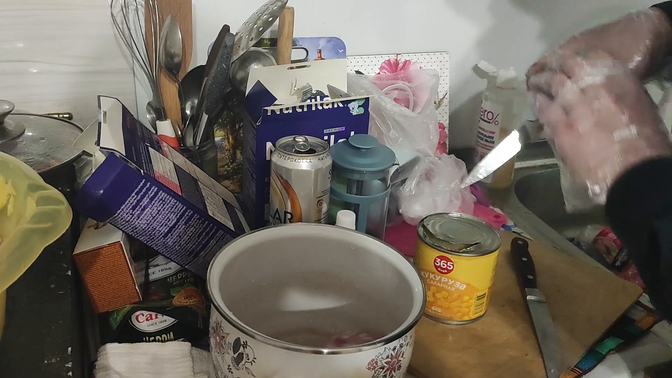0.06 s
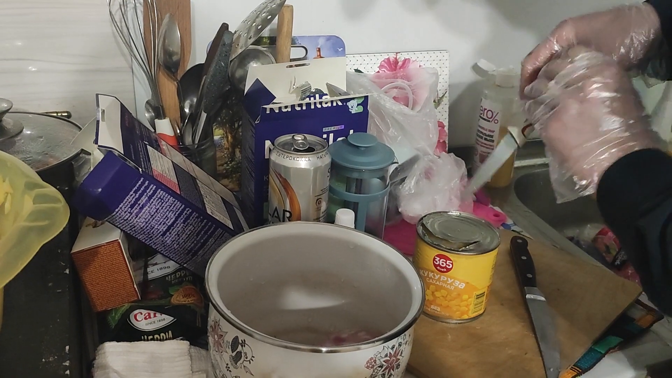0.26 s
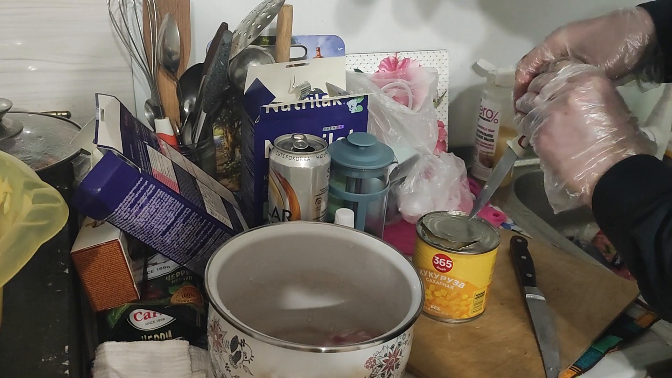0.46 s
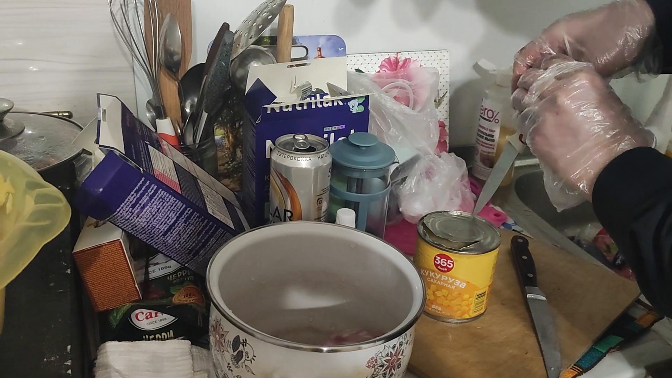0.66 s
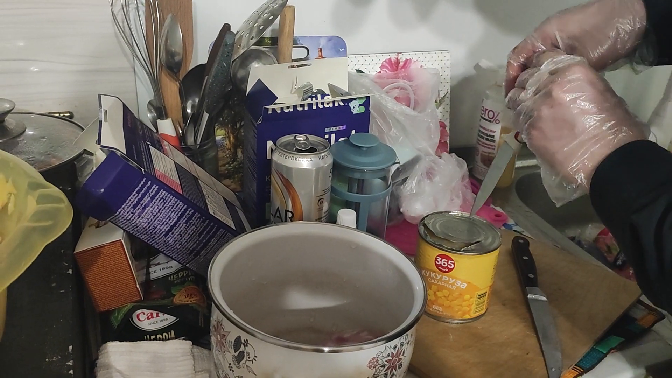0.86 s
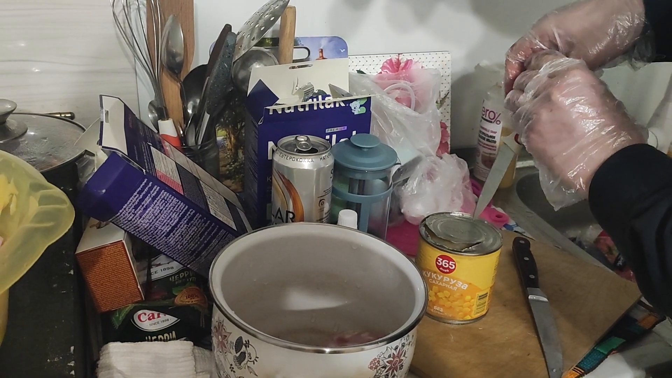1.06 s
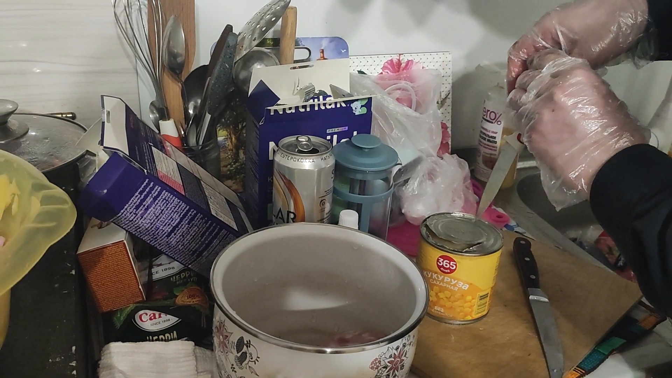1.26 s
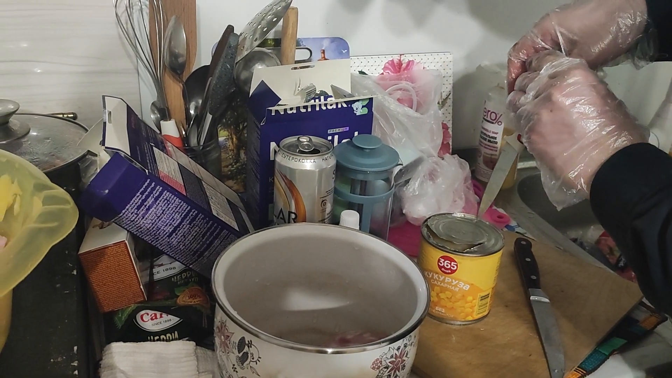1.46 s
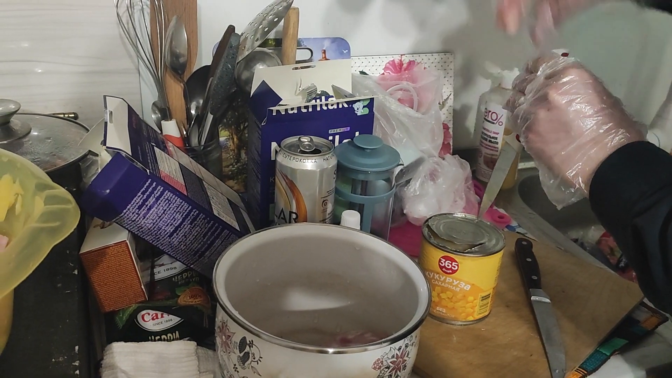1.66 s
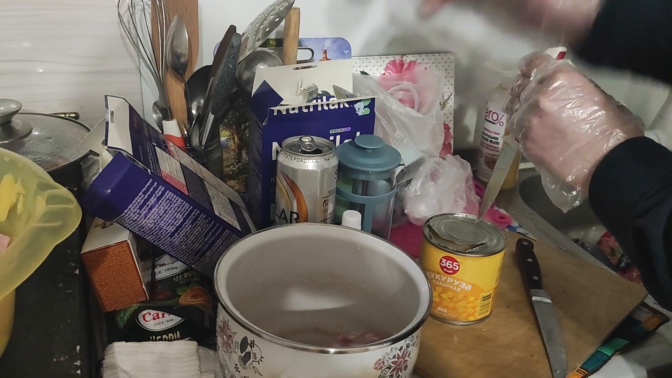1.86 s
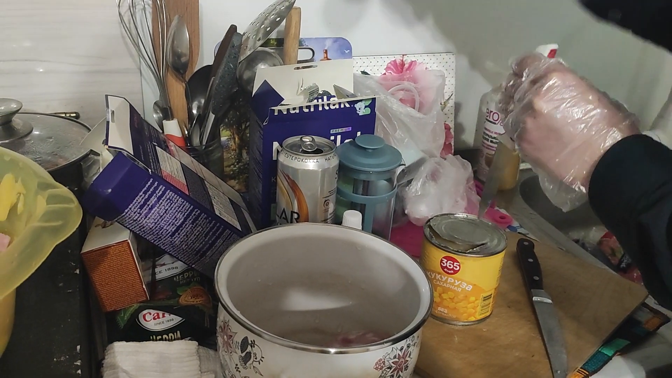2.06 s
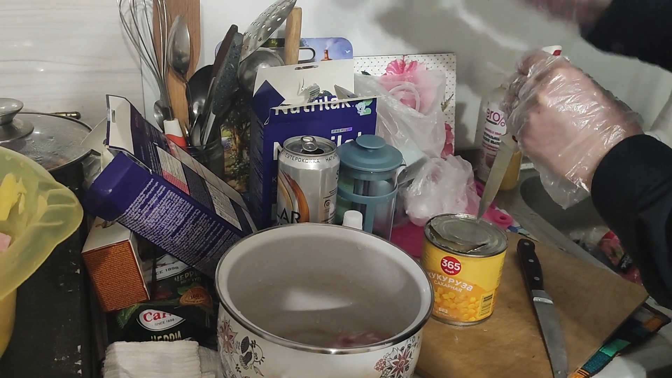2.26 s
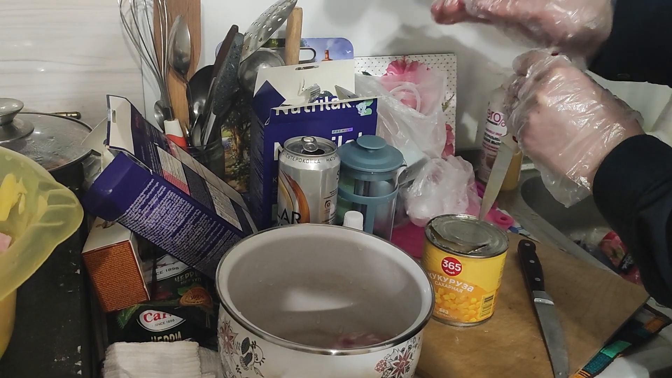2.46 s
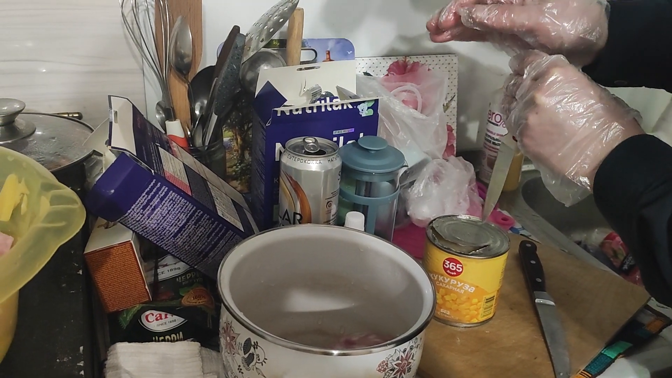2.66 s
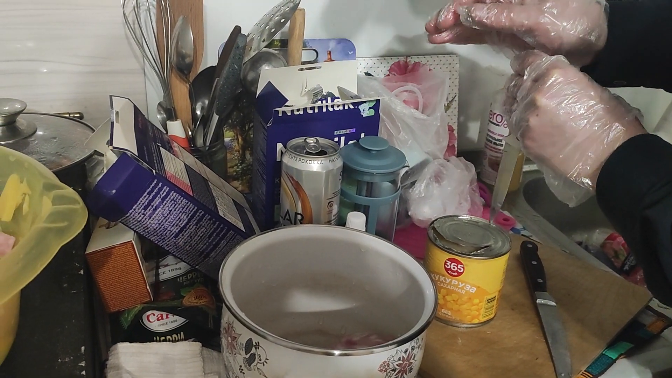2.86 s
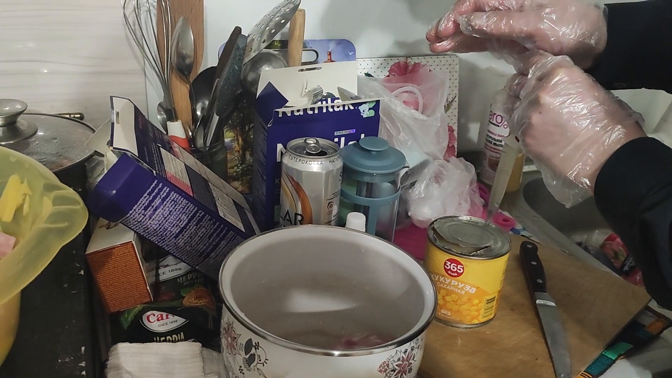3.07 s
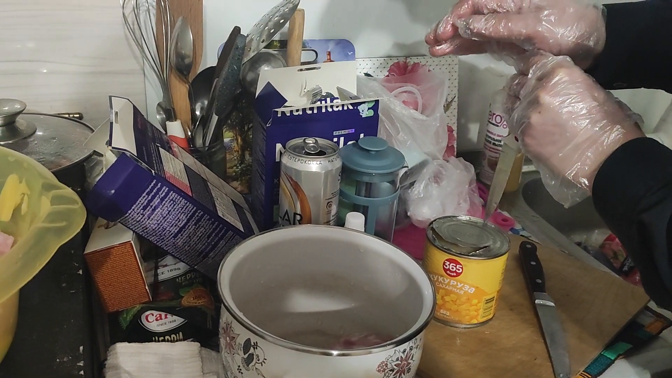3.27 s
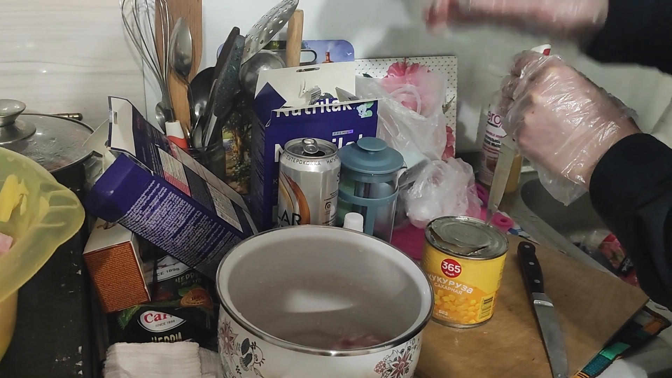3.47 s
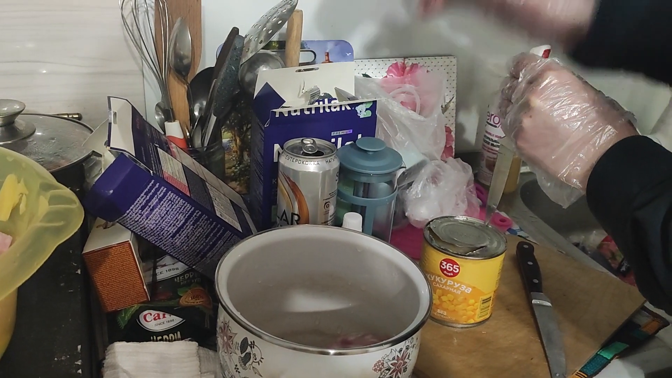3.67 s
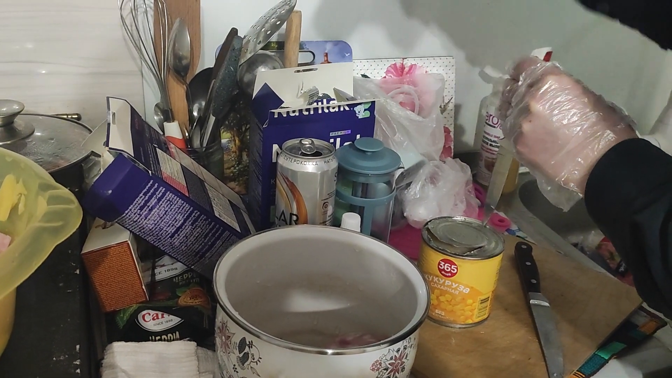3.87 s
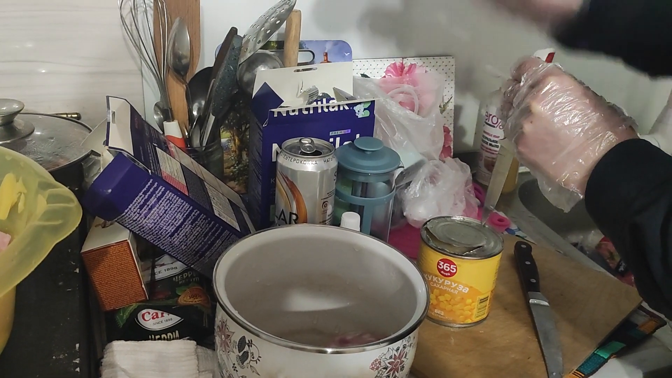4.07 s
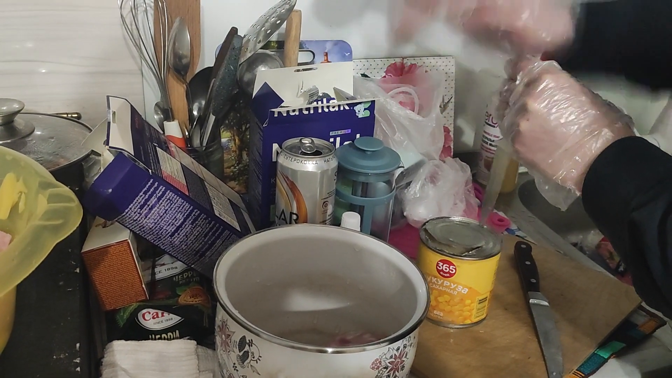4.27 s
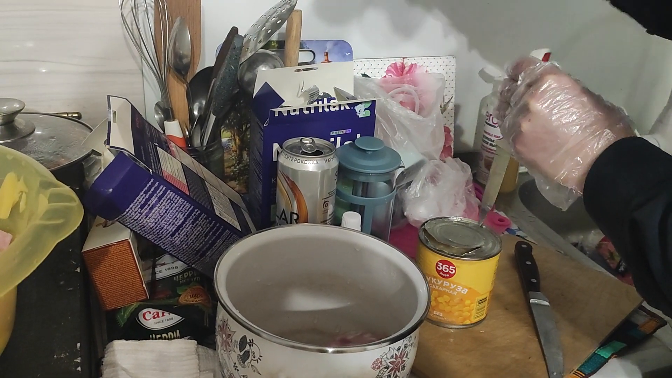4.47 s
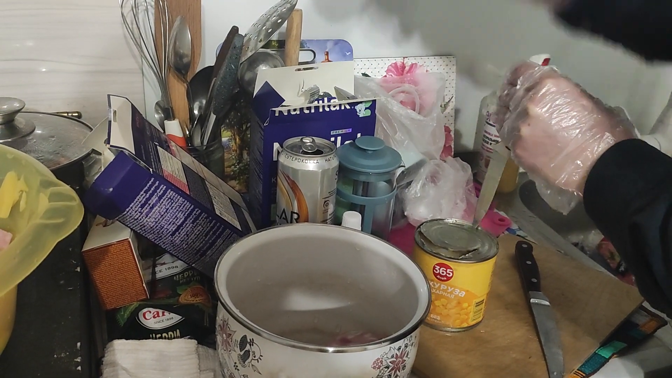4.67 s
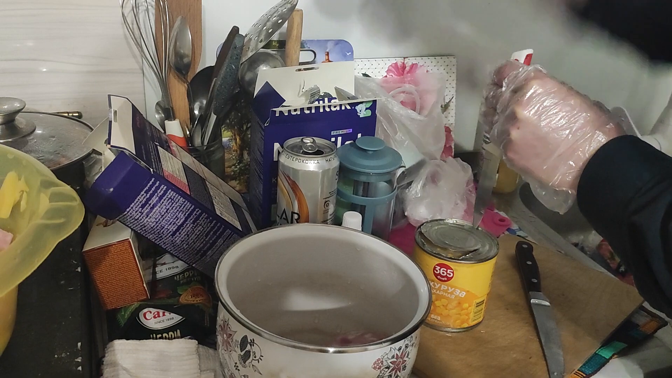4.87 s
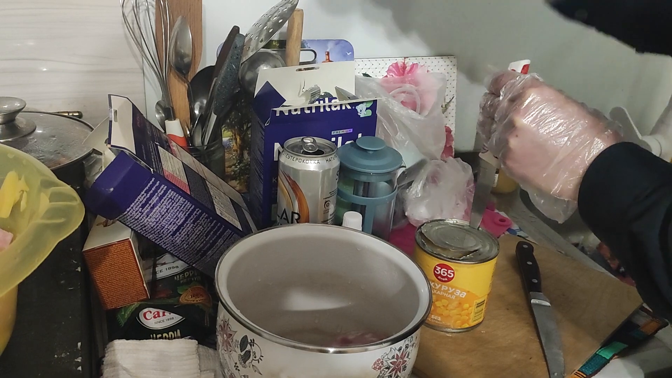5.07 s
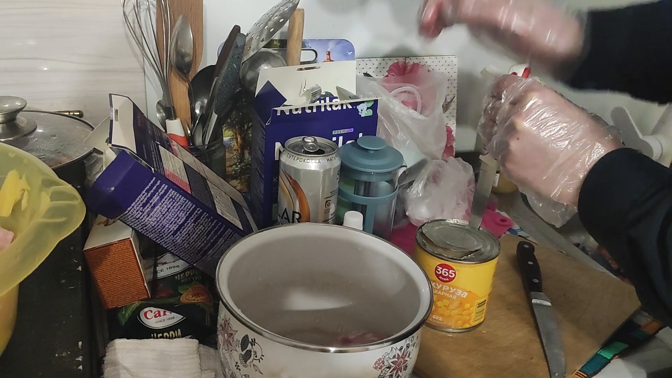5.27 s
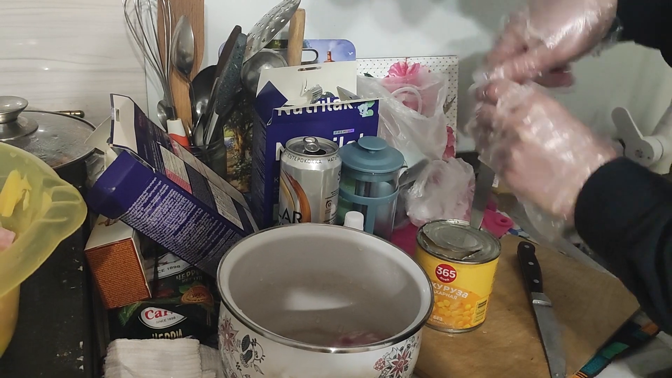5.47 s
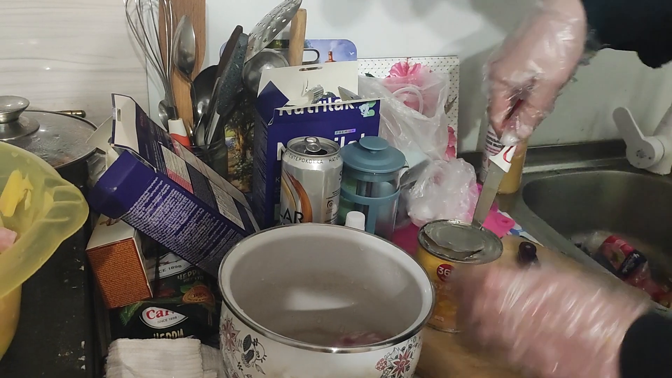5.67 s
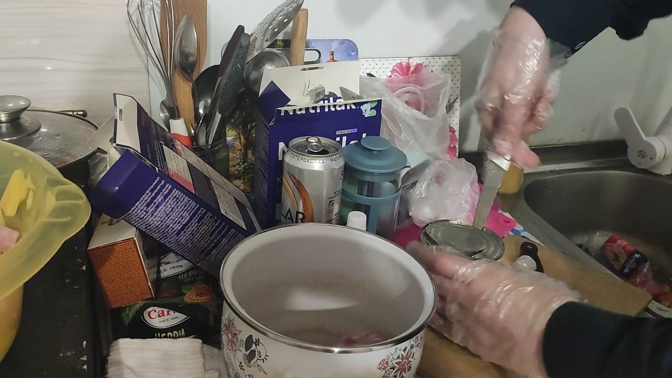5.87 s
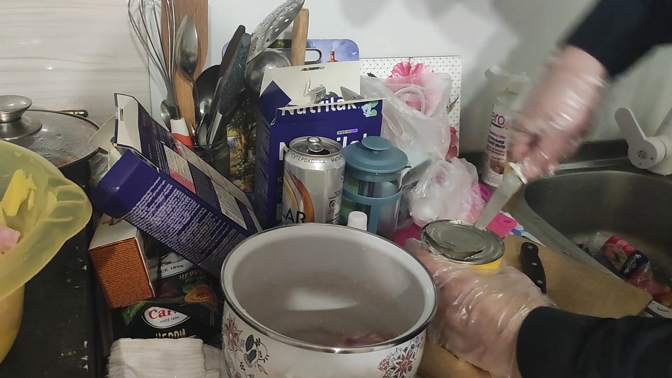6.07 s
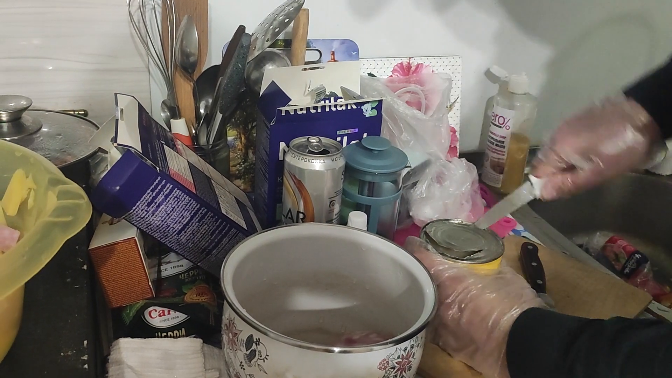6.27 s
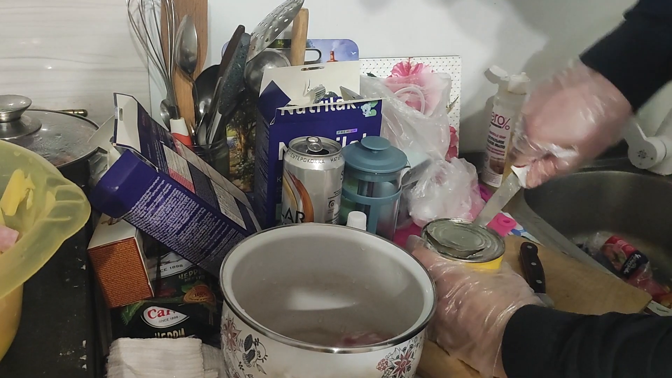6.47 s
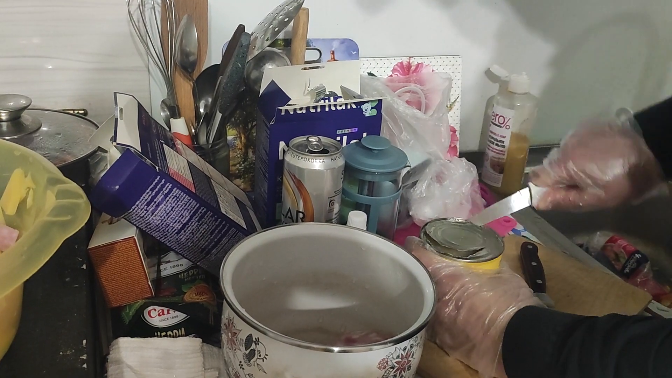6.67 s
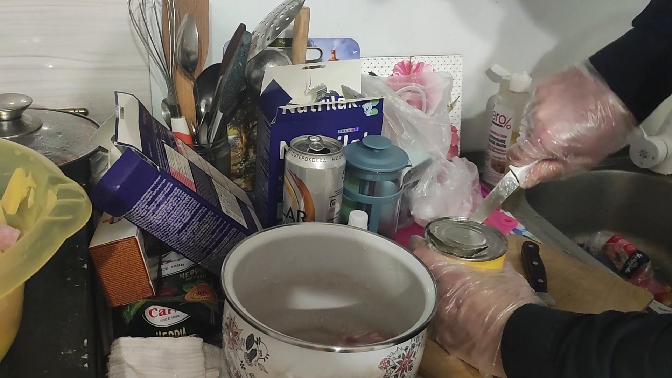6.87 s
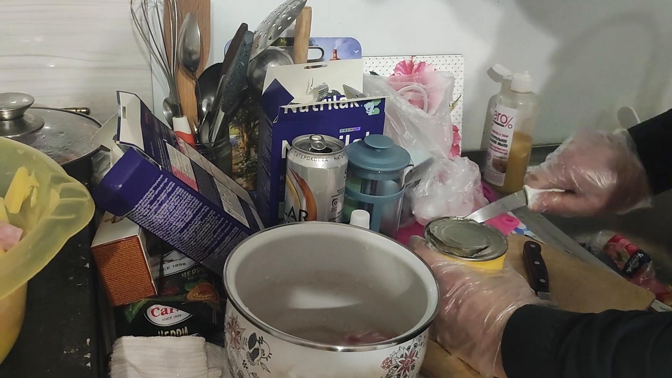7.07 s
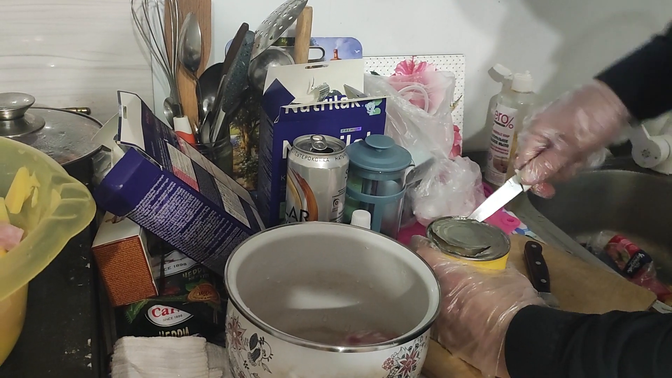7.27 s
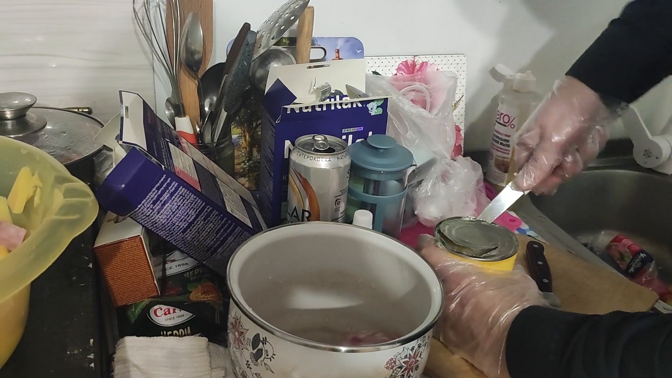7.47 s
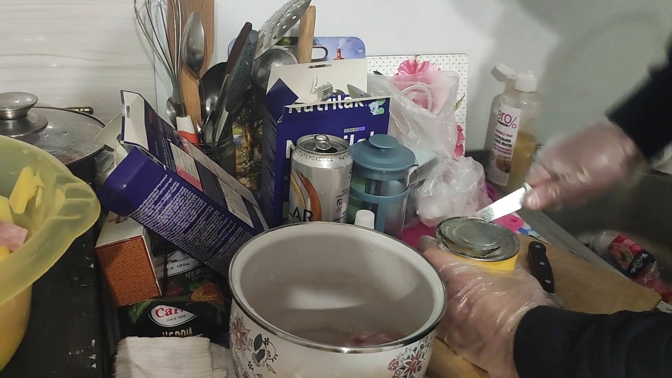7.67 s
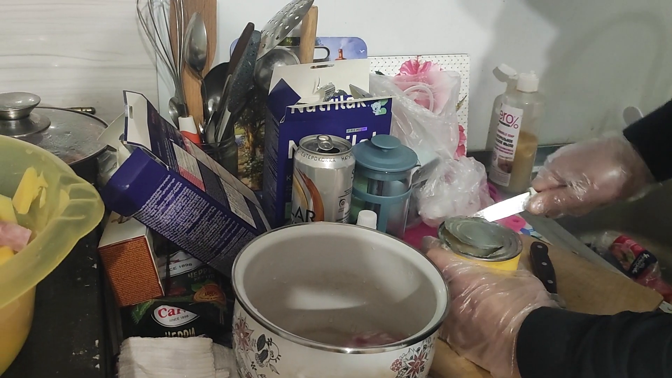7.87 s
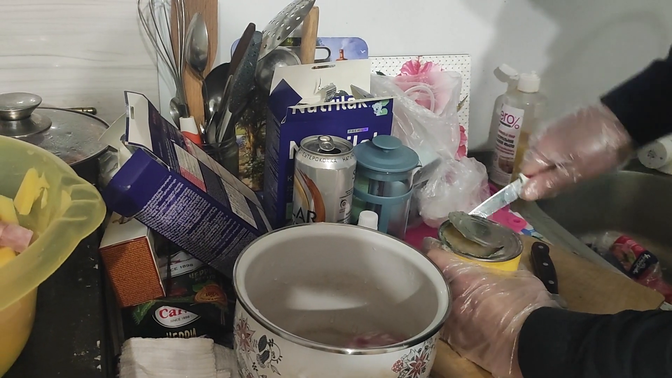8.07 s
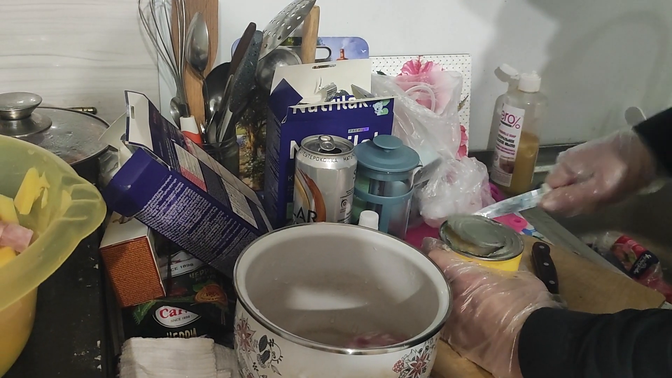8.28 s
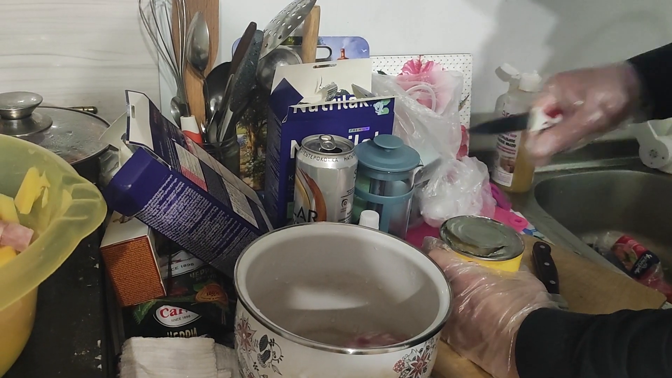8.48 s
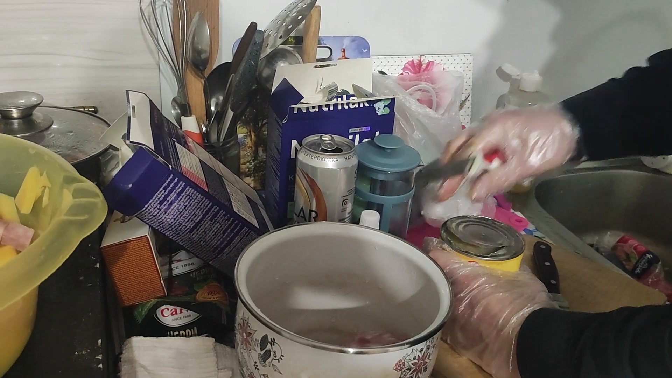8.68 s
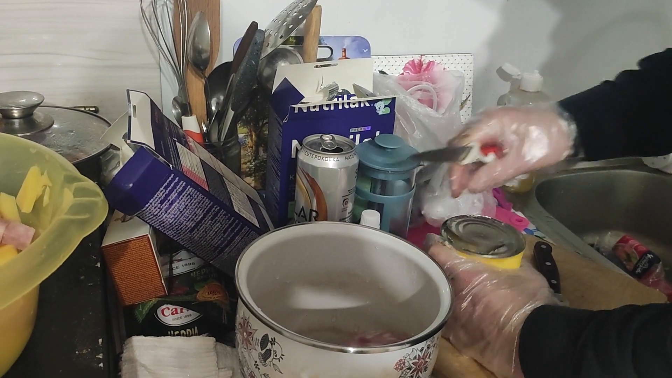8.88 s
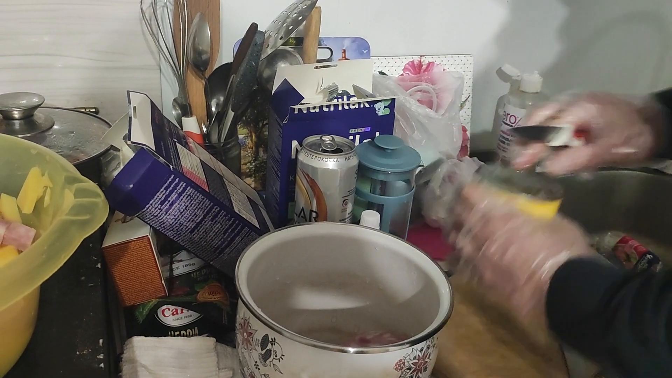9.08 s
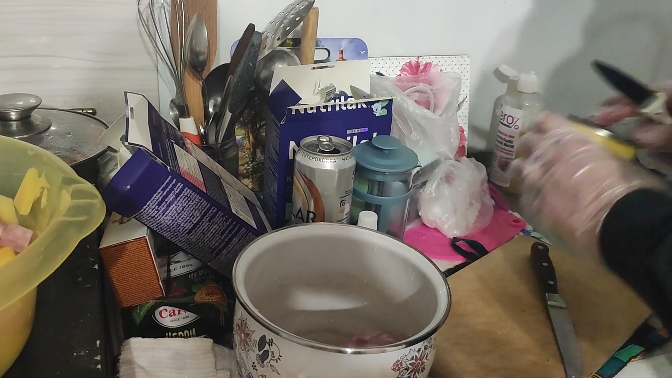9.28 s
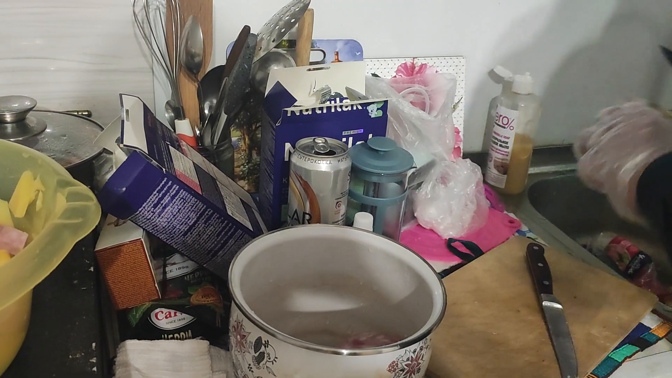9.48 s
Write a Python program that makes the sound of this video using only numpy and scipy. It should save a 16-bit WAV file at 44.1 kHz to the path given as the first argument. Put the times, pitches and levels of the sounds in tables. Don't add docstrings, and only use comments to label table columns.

```python
import sys
import numpy as np
from scipy import signal
from scipy.fft import rfft, irfft, next_fast_len
from scipy.io import wavfile
from scipy.ndimage import uniform_filter1d, minimum_filter1d

SR = 44100
rng = np.random.default_rng(int(sys.argv[2]) if len(sys.argv) > 2 else 0)


def wav_out(sig):
    wavfile.write(sys.argv[1], SR, np.round(np.clip(np.atleast_2d(sig).T, -1, 1) * 32767).astype(np.int16))


def invert_db(level):
    return 10 ** (np.asarray(level, dtype=float) / 20)


N = 419832

# f/Hz, level/dB
KITCHEN_SPECTRUM = [(12, -35), (20, -5), (53, -2.5), (77, -14.5), (128, -11.5), (230, -18), (265, -19),
                    (289, -20), (416, -23.5), (492, -24), (729, -26), (839, -28.5), (5670, -64),
                    (14700, -37), (16500, -46)]
KITCHEN_DB = -62
# f/Hz, level/dB
GLOVE_SPECTRUM = [(180, -14), (300, -11), (349, -4.5), (617, -13), (1060, -7), (1230, -9), (3030, -6.5),
                  (4540, -7), (7020, -4.5), (8020, -6), (10300, -3), (15200, -0.5), (16500, -8.5)]
# f/Hz, level/dB
SCRAPE_SPECTRUM = [(180, -20), (300, 0), (767, -9), (1050, -5), (1240, -5.5), (2230, -6), (2800, -8.5),
                   (3830, -10.5), (4680, -8), (7810, -15.5), (9000, -36), (11700, -62), (19800, -120)]
# t/s, glove rustle/dB, blade and sleeve/dB
BUSY = [(0, -53.5, -60.5), (.4, -61.5, -56.5), (.75, -64, -63.5), (1.3, -71.5, -68), (2.2, -65, -67.5),
        (2.7, -67, -63.5), (3.0, -72.5, -71), (3.3, -79, -66), (3.6, -69, -61.5), (5.05, -62.5, -76),
        (5.35, -52.5, -90), (5.9, -53, -50), (6.2, -62, -58), (6.9, -65, -55), (7.4, -58, -72),
        (7.56, -62.5, -73), (8.6, -64.5, -62), (9.52, -62.5, -53.5)]
# t/s, peak/dB, swell/s, fade/s
CRUMPLES = [(.37, -58.5, 0.046, .05), (1.578, -51, 0.12, 0.048), (1.7, -59.5, 0.073, .1),
            (1.848, -46.5, 0.065, 0.06), (3.39, -59, 0.084, 0.068), (3.9, -57.5, 0.072, 0.084),
            (4.18, -58.5, 0.082, 0.043), (4.48, -58.5, 0.098, 0.028), (4.82, -60.5, 0.11, .03),
            (6.97, -50, 0.022, 0.046), (7.13, -57, 0.097, 0.079), (7.29, -51.5, 0.14, 0.11),
            (7.85, -58, 0.014, 0.016), (8.01, -55, 0.014, 0.037), (8.08, -56, 0.0089, 0.02),
            (8.18, -56.5, 0.062, 0.1), (8.32, -53.5, 0.073, 0.28), (8.84, -57.5, 0.11, 0.17),
            (9.05, -56.5, 0.15, 0.096)]
# t/s, peak/dB, fade/s
SLAPS = [
    (2.768, -51, 0.038),
    (3.627, -50, 0.1),
    (3.931, -47.5, 0.079),
    (4.211, -43.5, 0.065),
    (4.504, -45, 0.067),
    (4.843, -42.5, 0.077),
    (5.134, -44, 0.089),
]
SLAP_SWELL_S = 0.013
# t/s, peak/dB, swell/s
DRAGS = [(1.17, -54, 0.017), (2.01, -52.5, 0.48), (2.36, -58, 0.016), (3.95, -52, 0.02), (4.26, -49, 0.077),
         (4.52, -45, 0.025), (7.6, -48.5, 0.079), (7.66, -46, 0.028), (7.72, -41.5, 0.046),
         (7.78, -42, 0.1), (7.92, -46.5, 0.055), (8.015, -37, 0.011), (8.1, -49, 0.054),
         (8.24, -37.5, 0.052), (8.32, -50, 0.035), (8.88, -51.5, 0.17), (9.062, -45, 0.032)]
DRAG_FADE_S = 0.048
HOLD = 1.52

# f/Hz, level/dB, t60/s
BOARD_MODES = [(225, -6, 0.27), (262, 1, 0.058), (272, 1.5, 0.14), (373.6, -5, 0.43), (437, -5.5, 0.054),
               (456.5, -7, 0.29), (620, -1, 0.063), (819, -8.5, 0.23)]
# f/Hz, level/dB, t60/s
WORKTOP_MODES = [(53.4, -16, 0.9), (55, 1, 0.14), (66.3, 7.5, 0.29), (82.5, -3.5, 0.62),
                 (105.2, -6.5, 0.52), (123, 2, 0.42), (147.3, 8.5, 0.35), (182.8, 6.5, 0.34)]
# t/s, board peak/dB, worktop above it/dB
THUMPS = [(0.356, -51, -17), (1.163, -46, -24), (1.837, -36.5, -13), (2.105, -46, -25), (2.16, -54, -21),
          (2.758, -40.5, -15), (2.799, -48, -17), (2.863, -46.5, -26), (3.631, -52.5, -1), (3.93, -36, 2),
          (4.204, -28, -3.5), (4.502, -22, -6), (4.836, -27, -9.5), (5.131, -32.5, -6.5),
          (6.196, -43.5, -19), (6.959, -47, -12), (7.293, -41, -29), (7.619, -39, -10), (7.84, -40.5, -18),
          (7.954, -37.5, -34), (8.009, -38.5, -14), (8.085, -42.5, -14), (8.2, -35, 0), (8.295, -46.5, -7)]
FAR_EDGE_S = .008

# f/Hz, level/dB, t60/s
FLAT_LID = [(372, -2.5, 0.12), (690, -20, 0.027), (1113, 0.5, 0.11), (1488, -4, 0.098), (1848, 2, 0.064),
            (1885, -7, 0.18), (1994, -2.5, 0.11), (2410, 2.5, 0.11), (2940, -31, 0.069), (3250, -25, 0.056),
            (3673, -0.5, 0.15), (4700, -25, 0.06), (5070, -6, 0.2), (6640, 1, 0.017), (7900, -14, 0.018),
            (8700, -33, 0.039)]
# f/Hz, level/dB, t60/s
BENT_LID = [(470, -14, 0.12), (1040, -1, 0.09), (1074, -8, 0.29), (1315, 6.5, 0.027), (1506, -2, 0.094),
            (1690, 1, 0.096), (1910, -7, 0.22), (2282, -0.5, 0.23), (2420, -1.5, 0.13), (2430, -17, 0.23),
            (2800, 4, 0.013), (3850, -3, 0.14), (5170, 10, 0.01), (5600, -4.5, 0.096), (8240, -17, 0.066)]
# f/Hz, level/dB
CRUNCH_SPECTRUM = [(300, -14), (700, -4), (1100, 5.5), (2000, 6.5), (3300, 4.5), (4600, -0.5), (6000, -8),
                   (8000, -10), (15000, -19)]
# t/s, peak/dB, favoured ring f/Hz, ring/dB, brightness/dB per octave
BLOWS = [
    (0.359, -27.5, 1270, -1.5, 2),
    (1.162, -35.5, 2100, 4, 4),
    (2.102, -29.5, 1280, 1, 1.5),
    (2.242, -51, 2080, 7.5, -8),
    (2.758, -17.5, 1760, -6.5, 0.5),
    (2.799, -35.5, 1100, -9, -11),
    (2.864, -54, 1960, 12, -14),
    (4.206, -32.5, 1950, -5, -9.5),
]
# t/s, peak/dB, favoured ring f/Hz, ring/dB, brightness/dB per octave
TEARS = [(0.462, -37.5, 2400, 2, 1.5), (0.868, -39, 2110, 1, -1.5), (1.086, -45.5, 2420, -2, 0),
         (1.817, -44, 2001, 2, -3), (1.834, -28.5, 1730, 6.5, 12), (1.97, -39, 1950, -0.5, 4.5),
         (2.014, -49.5, 1940, 10.5, -7), (2.152, -40, 1220, -3, -4), (3.32, -53, 1950, 2, 4),
         (3.931, -49, 2340, 5, -6), (4.505, -12, 2000, -19, 2), (4.842, -16, 2000, -9, 3.5),
         (5.135, -21, 2060, -3, -3)]
# t/s, peak/dB, favoured ring f/Hz, ring/dB, brightness/dB per octave
PRIES = [(6.197, -55, 923, -5, -6), (6.9593, -17, 1117, -7.5, -2.5), (7.28, -16.5, 1210, -11, -3),
         (7.569, -37.5, 1210, -20.5, -10), (7.626, -16, 1690, 2, 2), (7.845, -25.5, 1060, -1, -8),
         (7.952, -24, 1100, -3, 0.5), (8.013, -32, 2700, -6, 5), (8.048, -37, 2640, 7, -10),
         (8.08, -22.5, 1040, -5, -4), (8.193, -20.5, 1420, -7, -11), (8.234, -20.5, 1080, 0, 3),
         (8.249, -19.5, 2270, -9, 0), (8.281, -31, 2230, -12, 8), (8.295, -17.5, 2270, -4.5, 6),
         (8.518, -43, 2480, -11, 1)]
# t/s, peak/dB, favoured ring f/Hz, ring/dB, brightness/dB per octave
RASPS = [(5.928, -37.5, 1470, -2, 13.5), (6.138, -50, 1290, 1, -12), (6.22, -40, 1670, -8, 6),
         (6.372, -38, 1190, -13, -6), (6.486, -43.5, 1090, -3, -8.5), (6.634, -40, 1420, -3, -3.5),
         (6.785, -48, 2400, -3, -11.5), (7.107, -48.5, 1494, 3, -5), (7.232, -33, 1680, -8, 6),
         (7.343, -32.5, 1600, 0, 0.5), (7.59, -36.5, 1210, -8, -8.5), (7.645, -28.5, 5400, 3, -4),
         (7.82, -41, 1040, -13, -5), (8.002, -30, 1080, -3, 0), (8.177, -27.5, 1420, -2, -2),
         (8.213, -23, 2260, -2.5, 3), (8.254, -30.5, 2370, 4, -3), (8.702, -48, 3020, -1, 7),
         (8.851, -47.5, 1560, 9, -6), (9.039, -46, 2270, -17, 11)]
BLOW_MS, TEAR_MS, PRY_MS, RASP_MS = 4.94, 11, 6, 28
POP_S, POP_PAN_DB = 7.625, -14

# t/s, peak/dB, contact/ms, left
# minus right/dB
SNAPS = [
    (0.359, -32.5, 4, -7),
    (1.829, -36, 13, -4),
    (2.101, -40, 7.1, -4),
    (2.756, -22.5, 10, -4),
    (4.504, -22.5, 5.8, -6),
    (4.840, -15.5, 13.6, -1),
    (5.134, -31, 9.7, -5),
    (6.9584, -12, 1.8, -1.5),
    (7.278, -23, 4.4, -9),
    (7.6245, -14.5, 3.7, -13.5),
         (.866, -45, 3.2, -4), (1.162, -40.5, 5.3, 1), (7.6314, -11, 1.9, -5), (7.843, -36.5, 5, -4),
          (7.951, -31, 4.2, -2), (8.079, -40, 4.7, -1), (8.190, -30, 9.8, -3), (8.232, -24.5, 11, -6),
          (8.294, -24, 7.4, -3), (7.690, -34.5, 34, -11), (7.66, -36, 60, -6), (8.092, -40, 15, -2),
          (8.303, -32.5, 55, -5), (4.858, -30, 45, -1)]
# f/Hz, width/Hz, level/dB
SNAP_SHAPES = [
    [(1240, 86, 7.5), (2584, 130, 4), (3650, 89, -15), (5620, 110, -21), (7700, 290, -28)],
    [(1830, 35, 3), (2450, 55, -6), (3820, 52, -18), (5300, 54, 0), (6500, 30, -14), (8100, 91, -14)],
    [(1220, 37, -12), (1980, 29, 7), (3600, 83, -8), (5070, 130, -12), (8950, 20, -19)],
    [(1060, 38, -0.5), (1856, 33, 0.5), (3570, 37, -14), (3840, 28, -19), (5370, 72, -9), (6470, 200, -18)],
    [(2020, 35, -2), (2980, 32, -7), (3777, 83, -1), (7780, 150, -8), (9510, 38, -7), (11100, 47, -19)],
    [(1040, 33, -9), (1950, 39, -6), (2390, 38, -12), (2780, 39, -7.5), (5200, 120, -14),
     (6740, 120, -20.5), (7720, 200, -21), (9100, 47, -27)],
    [(1960, 31, 1), (2400, 27, 0), (3000, 39, -8), (5270, 56, -12), (6400, 38, -17)],
    [(1040, 50, -2), (1794, 95, -1), (2163, 145, 2.5), (3730, 120, -9), (5470, 150, -8), (7940, 240, -7),
     (9060, 200, -12), (10800, 290, -11), (12000, 250, -16)],
    [(1090, 170, -0.5), (1420, 140, -2), (2930, 130, 0), (3800, 120, -1), (5870, 400, -16),
     (8100, 440, -22)],
    [(1080, 90, -3), (1670, 110, -4), (2220, 76, -10), (3490, 160, -30), (4090, 350, -13),
     (5400, 160, -7.5), (7140, 190, -23), (8160, 100, -24), (9130, 370, -20.5)],
]
# f/Hz, width/Hz, level/dB
MORE_SNAP_SHAPES = [
    [(1977, 36, 0), (2380, 32, 0), (3300, 59, -13), (4430, 61, -13)],
    [(1143, 89, -5), (1970, 37, -2), (2420, 24, 1), (3630, 52, -5)],
    [(1666, 19, 6), (3460, 31, -20), (5260, 280, -15.5), (6300, 22, -20)],
    [(1020, 31, 0), (2400, 34, -12), (4260, 34, -17), (5840, 29, -18), (13000, 34, -23)],
    [(1100, 190, 2), (2240, 140, -8), (5900, 300, -6), (8110, 440, -21), (13000, 150, -21)],
    [(1036, 23, -2), (2270, 30, -11), (3870, 33, -14), (4170, 39, -13)],
    [(1420, 140, 2), (2600, 95, -11), (3890, 110, -14), (4530, 83, -22), (5080, 140, -20)],
    [(2260, 69, -2), (3240, 190, -10), (3960, 60, -5), (4410, 25, -13), (5000, 78, -14), (7710, 29, -5)],
    [(2230, 31, 1), (3540, 36, -5), (3960, 200, -10), (6240, 29, -14), (7550, 47, -9), (8800, 27, -19)],
    [(1727, 59, 1), (2930, 96, -17), (4180, 63, -8), (5640, 130, -13), (6410, 40, -23)],
    [(3300, 400, 1), (4700, 500, -2), (6500, 600, -8)],
    [(1050, 60, -2), (1700, 200, -6)],
    [(2290, 60, 0), (4700, 400, -20)],
    [(1950, 60, 0), (2380, 60, -12)],
]
SHARPEST = 90

KNIFE_PAN_DB = -1
SCATTER_HZ, SCATTER_DB = 450.1, -19
# f/Hz, left minus right/dB
PORT_TILT = [(60, 0.5), (400, 0.5), (1300, -3), (4400, -0.5), (8100, -3), (15000, 3.5)]
# f/Hz, level/dB
CASING = [(20, -6.5), (45, 2), (4000, 3.5), (4650, 1), (5500, 2), (6300, 1.5), (7000, -0.5), (7900, 5),
          (9500, 2), (10500, -1.5), (11500, 0.5)]
TOP_HZ = 15850


def unit(x):
    return x / np.sqrt(np.mean(x ** 2))


def colour(x, table, share=1):
    hz, db = np.transpose(table)
    length = x.shape[-1]
    size = next_fast_len(length)
    f = np.maximum(np.arange(size // 2 + 1) * SR / size, 1)
    gain = invert_db(share * np.interp(np.log(f), np.log(hz), db))
    return irfft(rfft(x, size) * gain, size)[..., :length]


def band(x, lo_hz, hi_hz):
    edges = [lo_hz, min(hi_hz, .45 * SR)]
    return signal.sosfilt(signal.butter(2, edges, "band", fs=SR, output="sos"), x)


def walk(rate):
    k = int(SR / rate)
    steps = np.repeat(rng.standard_normal(N // k + 1), k)
    return uniform_filter1d(uniform_filter1d(steps, k), k)[:N]


def pair(x, alike_hz):
    side = signal.sosfilt(signal.butter(1, alike_hz, "high", fs=SR, output="sos"), x[1])
    return np.array([x[0] + side, x[0] - side])


def add(out, sound, s):
    at = int(s * SR)
    out[:, at:at + sound.shape[1]] += sound


def pan(db):
    return invert_db(np.array([[db], [-db]]) / 2)


def ring(modes, t, lift_db, luck, spread):
    hz, db, t60 = np.transpose(modes)[:, :, None]
    pitch_luck, level_luck, port_luck, phase_luck = luck
    hz = hz * (1 + 0.0069 * pitch_luck)
    start = invert_db(db + lift_db + 1.44 * level_luck) * np.exp(1j * np.pi * phase_luck)
    turn = np.exp((2j * np.pi * hz - np.log(1000) / t60) / SR)
    swing = start * np.cumprod(turn.repeat(len(t), axis=1), axis=1)
    part = 0.37 * hz / 1000 + spread * np.sqrt(hz / 1000) * port_luck
    return np.imag([np.sum(swing * np.exp(-side * part * 1j / 2), axis=0) for side in (1, -1)])


def excite(body, force):
    out = signal.fftconvolve(body, force[None], axes=1)[:, :len(force)]
    return out / abs(out).max()


def kitchen():
    air = unit(colour(pair(rng.standard_normal((2, N)), 300.0), KITCHEN_SPECTRUM))
    hum = np.zeros(N)
    for hz, db in [(51., -12.5), (120., -24.0)]:
        level = invert_db(db + 6.8 * walk(4.8))
        hum += level * np.sin(2 * np.pi * hz * np.arange(N) / SR + 1.3 * walk(24))
    return invert_db(KITCHEN_DB + 0.7) * (air + hum)


def gestures(rest_db, rows):
    t = np.arange(0, N, 64) / SR
    power = invert_db(2 * np.interp(t, np.transpose(BUSY)[0], rest_db))
    for s, db, swell_s, fade_s in rows:
        away = np.where(t < s, (s - t) / swell_s, (abs(t - s) / fade_s) ** HOLD)
        power = power + invert_db(2 * db - 20 * away)
    return np.interp(np.arange(N) / SR, t, np.sqrt(power))


def hands():
    _, glove_db, scrape_db = np.transpose(BUSY)
    grains = rng.standard_normal((2, N)) * invert_db(1.5 * rng.exponential(size=N) + 1.75 * walk(70))
    glove = unit(colour(pair(grains, 1500.0), GLOVE_SPECTRUM))
    rub = rng.standard_normal((2, N)) * invert_db(2.46 * rng.exponential(size=N) + 3.1 * walk(45))
    scrape = unit(colour(pair(rub, 1550.0), SCRAPE_SPECTRUM))
    slaps = [(s, db, SLAP_SWELL_S, fade_s) for s, db, fade_s in SLAPS]
    drags = [(*row, DRAG_FADE_S) for row in DRAGS]
    rustling = invert_db(7.0) * gestures(glove_db, CRUMPLES + slaps) * glove
    return rustling + invert_db(-6.0) * gestures(scrape_db, drags) * scrape


def board():
    out, t = np.zeros((2, N + SR)), np.arange(int(.4 * SR)) / SR
    for s, db, worktop_db in THUMPS:
        luck, rocking = rng.standard_normal((4, len(BOARD_MODES), 1)), rng.standard_normal(len(t))
        lift_db = -.45 * max(db + 41.5, 0) * np.log2(np.array(BOARD_MODES)[:, :1] / 250.)
        press = 0.03 * max(db + 39.5, 0)
        damped = [(hz, mode_db, 0.33 * t60 / (1 + press * (hz / 360.0) ** 2))
                  for hz, mode_db, t60 in BOARD_MODES]
        wood = ring(damped, t, lift_db, luck, .05)
        landing = np.exp(-((t - .005) / 0.000097) ** 2)
        far_edge = np.exp(-((t - .005 - FAR_EDGE_S) / .0007) ** 2) / 7
        landing = landing + 1.7 * np.clip((db + 39.5) / 5.8, 0, 1) * far_edge
        settling = rocking * (1 - np.exp(-t / 0.0024)) * np.exp(-t / 0.06)
        thump = excite(wood, landing + 0.14 * settling)
        worktop = ring(WORKTOP_MODES, t, 0, luck[:, :len(WORKTOP_MODES)], 0.092)
        shake = excite(worktop, t * np.exp(-t / 0.0013))
        chatter = band(rocking * (1 - np.exp(-t / 0.0019)) * np.exp(-t / 0.051), 440.0, 930.0)
        add(out, invert_db(db - 2.5) * chatter[None], s)
        add(out, invert_db(db + 0.5) * thump, s - .0015)
        add(out, invert_db(db + worktop_db) * shake, s + FAR_EDGE_S / 2)
    return out[:, :N]


def contact(lid, ring_hz, ring_db, tilt_db, ms):
    t, lid = np.arange(int(.28 * SR)) / SR, np.array(lid)
    luck, grit = rng.standard_normal((4, len(lid), 1)), rng.standard_normal((4, len(t)))
    age = t / (np.clip(ms, 1, 40) / 1000)
    force = (1 - np.exp(-age / (0.009 * ms))) * (np.exp(-age ** 2) + 0.17 * np.exp(-t / 0.038))
    tears = force * grit[0] * invert_db(6.2 * grit[1])
    lift_db = 12.9 * np.exp(-(np.log(lid[:, :1] / ring_hz) / 0.085) ** 2)
    damped = ring(lid * [1, 1, .7], t, lift_db, luck, 1.0)
    bite = np.exp(-((age - .4) / 0.0011) ** 2)
    tin = excite(damped, bite / bite.sum() + 0.14 * tears / np.linalg.norm(tears))
    tin = tin * invert_db(51.0 * uniform_filter1d(grit[1], size=250))
    tilted = [(hz, db + tilt_db * np.log2(hz / 2000)) for hz, db in CRUNCH_SPECTRUM]
    crunch = colour(tears + 2.53 * force * grit[2:], tilted)
    crunch = crunch / abs(band(crunch, 800., 6000.)).max()
    tick = band(np.exp(-t / 0.00075) * (grit[0] + grit[2:]), 2500.0, 17000.0)
    tick_db = -9.5 + 1.0 * tilt_db - .5 * ms
    return invert_db(ring_db - 4.0) * tin + invert_db(-4.0) * crunch + invert_db(tick_db) * tick


def knife():
    out = np.zeros((2, N + SR))
    kinds = [(FLAT_LID, BLOWS, BLOW_MS), (FLAT_LID, TEARS, TEAR_MS),
             (BENT_LID, PRIES, PRY_MS), (BENT_LID, RASPS, RASP_MS)]
    for lid, rows, ms in kinds:
        for s, db, *touch in rows:
            pan_db = POP_PAN_DB if abs(s - POP_S) < .03 else 0
            add(out, invert_db(db) * pan(pan_db) * contact(lid, *touch, ms), s - .0012)
    return out[:, :N]


def snaps():
    out, t = np.zeros((2, N + SR)), np.arange(int(.2 * SR)) / SR
    for (s, db, ms, pan_db), shape in zip(SNAPS, SNAP_SHAPES + MORE_SNAP_SHAPES):
        luck, grit = rng.standard_normal((4, len(shape), 1)), rng.standard_normal((2, len(t)))
        luck[:2] = 0
        modes = []
        for hz, width, mode_db in shape:
            t60 = np.log(1000) / np.pi / max(width, 40 + hz / SHARPEST)
            modes.append((hz, mode_db + 20 * np.log10(width), t60))
        age = t / (ms / 1000)
        force = age ** 0.43 * np.exp(-age ** 2) * grit[0] * invert_db(5.5 * grit[1])
        fizz = band(np.exp(-(t / .011) ** 2) * grit, 9500., 17600.0)
        fizz = invert_db(-19.0 - .3 * ms) * fizz / abs(fizz).max()
        tin = excite(ring(modes, t, 0, luck, 0.68), force)
        tin = band(tin, 0.79 * shape[0][0], 17600.0) * invert_db(33.0 * uniform_filter1d(grit[1], size=200))
        add(out, invert_db(db) * pan(pan_db) * (tin + fizz), s)
    return out[:, :N]


def walls(t60_s=0.35):
    t = np.arange(int(.5 * SR)) / SR
    echoes = band(rng.standard_normal((2, len(t))), 140.0, 5700.0)
    tail = echoes * np.exp(-np.log(1000) * t / t60_s) * np.clip(t / 0.0035, 0, 1)
    return tail / np.sqrt(np.sum(tail ** 2, axis=1, keepdims=True))


def scene():
    blade, tail = knife(), walls()
    rest = board() + hands() + kitchen()
    left, right = (blade + snaps()) * pan(KNIFE_PAN_DB)
    near = np.array([np.roll(left, 2), right])
    blurred = near.mean(axis=0) * (invert_db(-11.5) + invert_db(SCATTER_DB) * walk(SCATTER_HZ))
    return near + signal.fftconvolve(blurred[None], tail, axes=1)[:, :N] + rest


def thin_out(x, keep=.82, from_hz=3200.):
    hz, _, cells = signal.stft(np.array([x[0] + x[1], x[0] - x[1]]) / 2, SR, nperseg=1024)
    power = uniform_filter1d(abs(cells) ** 2, size=5, axis=2)
    power = uniform_filter1d(power, size=3, axis=1) + 1e-18
    share = power / uniform_filter1d(power, size=41, axis=1)
    loud = np.sum(abs(cells[:, hz > from_hz / 2]) ** 2, axis=(0, 1))
    calm = loud < 5 * minimum_filter1d(loud, size=5)
    edge = calm * keep / (1 + (from_hz / (hz[:, None] + 1)) ** 3)
    thinned = cells * np.clip((share - edge) / .25, .03, 1)
    mid, side = signal.istft(thinned, SR, nperseg=1024)[1][:, :N]
    return np.array([mid + side, mid - side])


def roll_off(x):
    return signal.sosfilt(signal.butter(12, 17010, fs=SR, output="sos"), x)


def record(dry):
    ports = np.array([colour(dry[0], PORT_TILT, .5), colour(dry[1], PORT_TILT, -.5)])
    thinned = thin_out(colour(ports, CASING))
    low_pass = signal.ellip(8, .2, 60, TOP_HZ, fs=SR, output="sos")
    return roll_off(signal.sosfilt(low_pass, thinned))


dry = scene()
out = record(dry)
wav_out(out)
```